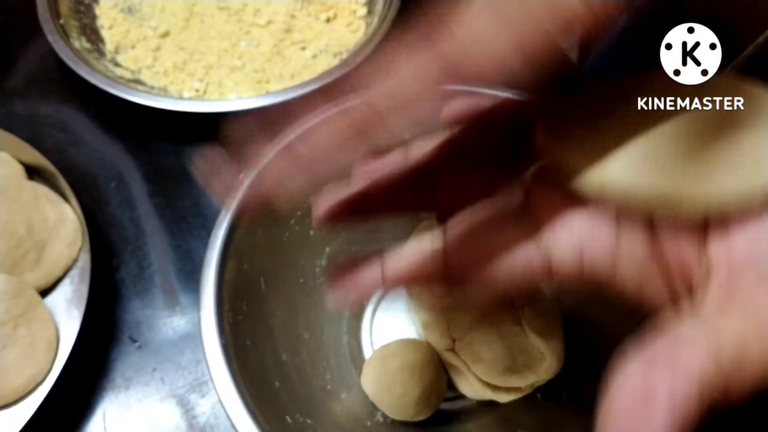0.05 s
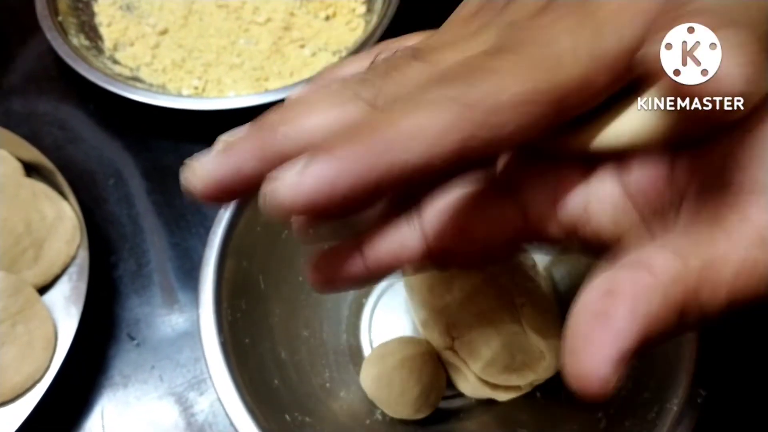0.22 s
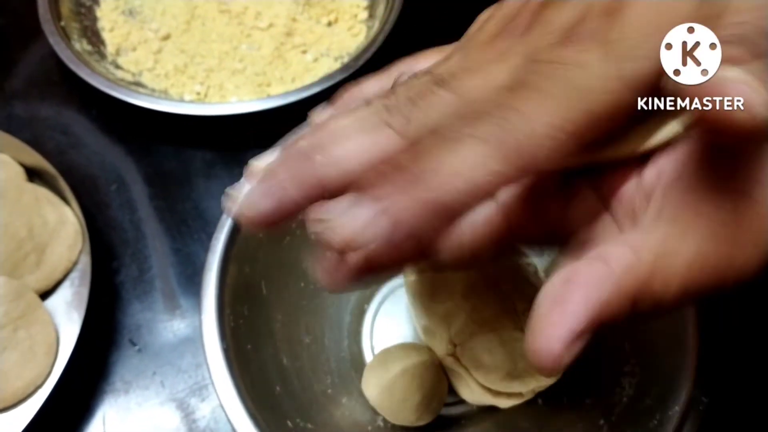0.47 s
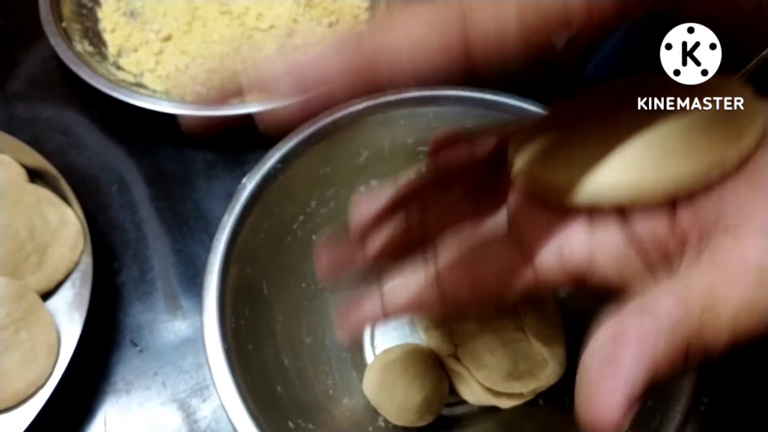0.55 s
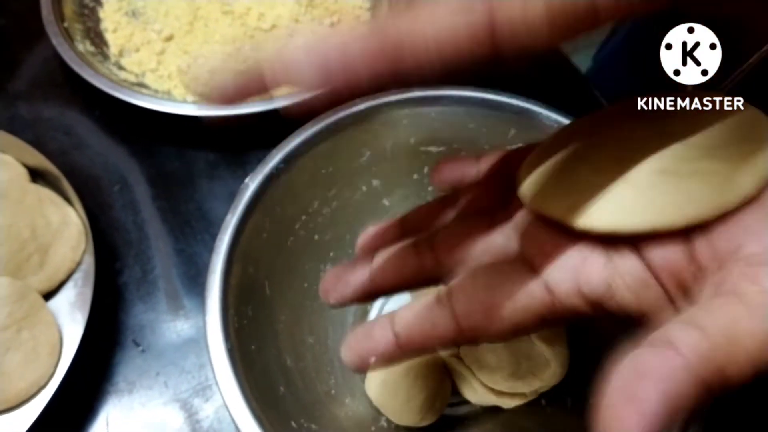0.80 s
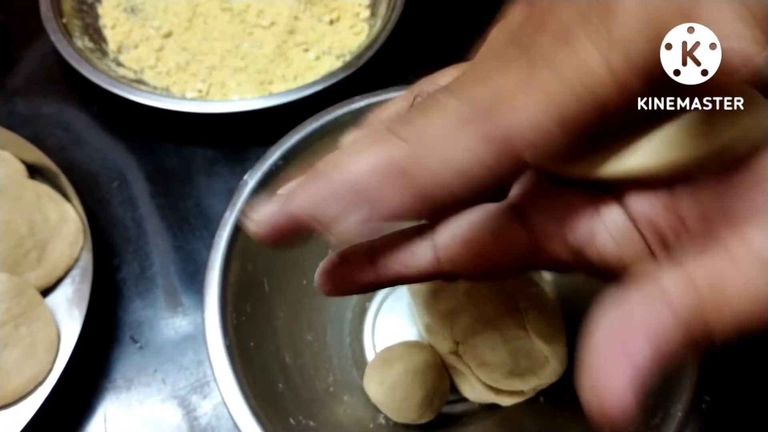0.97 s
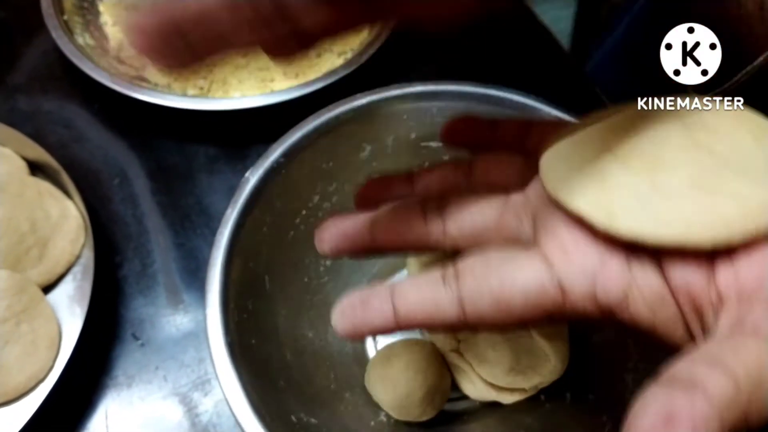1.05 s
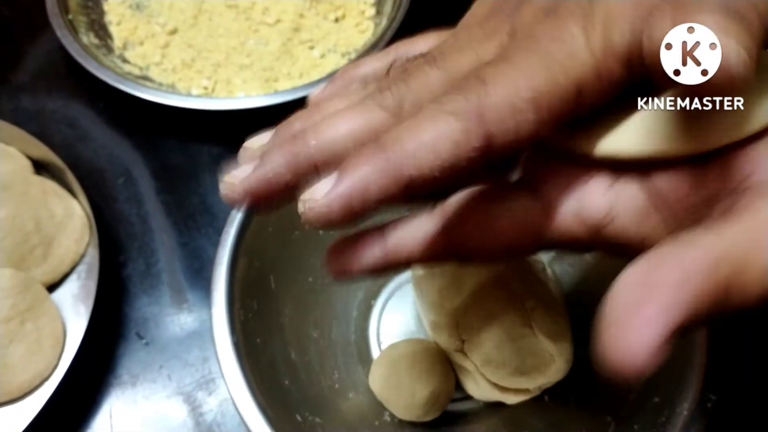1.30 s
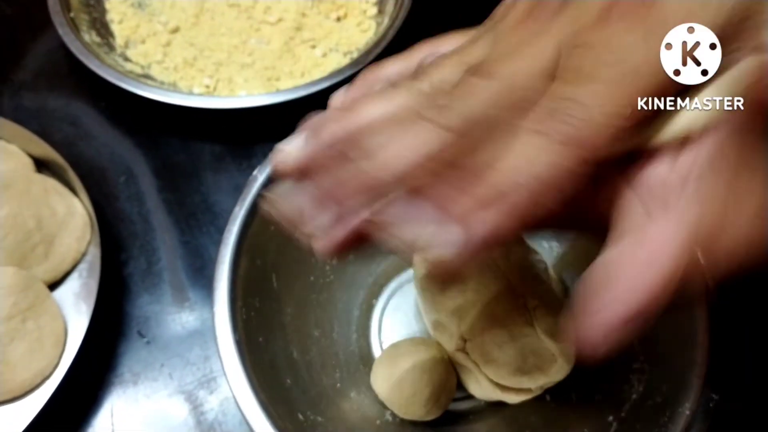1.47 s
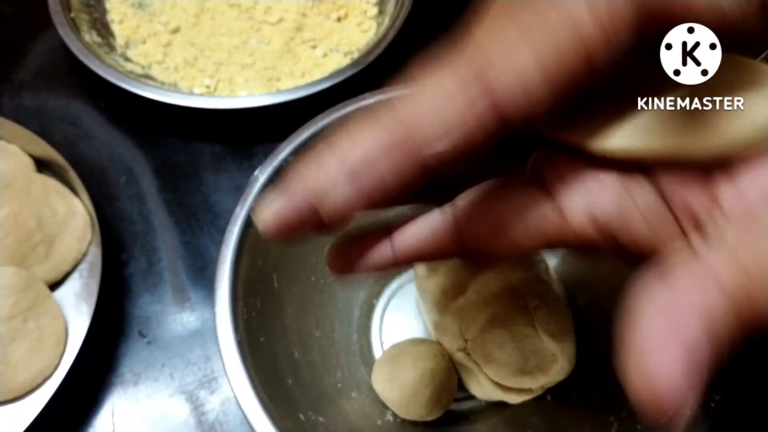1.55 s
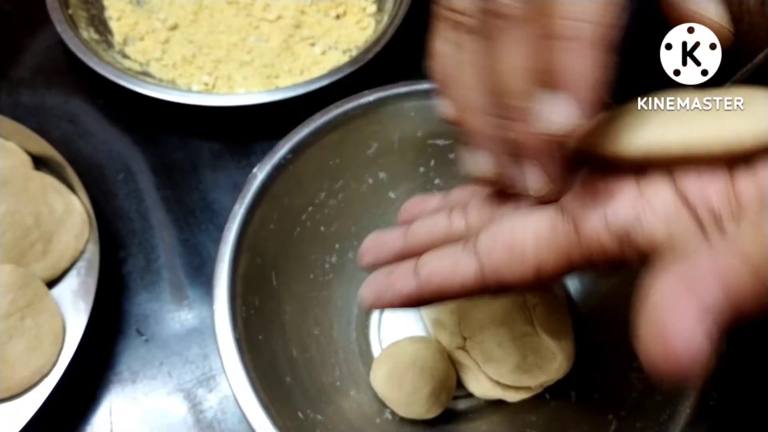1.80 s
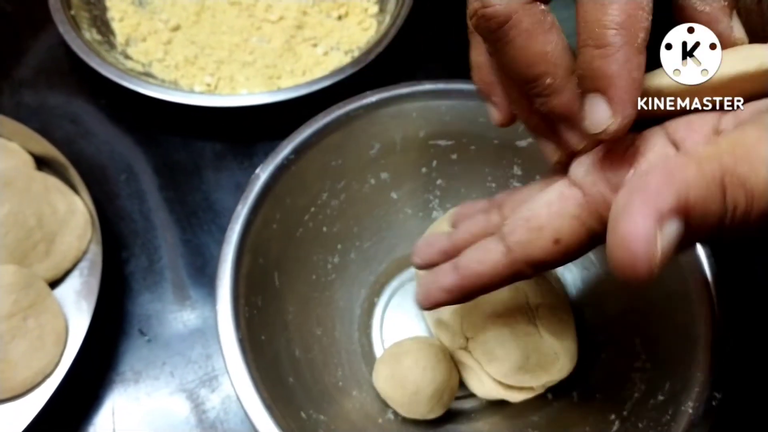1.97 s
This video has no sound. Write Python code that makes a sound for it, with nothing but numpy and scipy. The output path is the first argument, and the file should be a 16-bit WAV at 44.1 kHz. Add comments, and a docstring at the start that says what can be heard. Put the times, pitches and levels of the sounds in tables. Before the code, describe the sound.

Close, sharp slaps of palm on soft dough, six at a brisk uneven pace with one longer gap before the fifth, then only the fading hard-walled room ring and quiet background hum.

```python
"""Patting a cake of dough

A hand slaps a flat cake of dough lying on the other palm, six times, close to the microphone.
Each slap layers damped tones (thud, smack, trapped air) with short noise bursts (spray, crack, sizzle).
A dull echo stands for the steel bowl and counter below; shaped, decaying noise rings as a hard-walled
kitchen. Two slaps whistle, fingers brush once, and steady filtered noise and a faint hum lie beneath."""
import sys
import numpy as np
from scipy import signal
from scipy.fft import rfft, irfft
from scipy.io import wavfile
from scipy.ndimage import uniform_filter1d

SR = 44100
rng = np.random.default_rng(int(sys.argv[2]) if len(sys.argv) > 2 else 0)


def to_wav(s):
    """Save 16-bit WAV."""
    ch = np.atleast_2d(s).T  # columns
    pcm = np.round(np.clip(ch, -1, 1) * 32767)  # PCM
    wavfile.write(sys.argv[1], SR, pcm.astype(np.int16))


N = 90404

# One slap per row, with relative levels: (time [s], thud level [dB], thud pitch [Hz], smack level [dB],
# air pocket level [dB], air pocket pitch [Hz], spray level [dB], spray centre [Hz],
# crack level [dB], sizzle level [dB], room level [dB])
SLAP_EVENTS = [ (0.2458, -13.5, 325, -9.5, -2, 2486, -16.5, 3430, -19, -36.5, 2.5),
               (0.4857, -8.5, 308, -1, -0.5, 2580, -30.5, 5500, -22, -36, -1),
               (0.7073, -7, 314, -6.5, -10.5, 2890, -36, 7800, -22.5, -39, -2),
               (0.9160, -6, 358, -3.5, -3, 2500, -21, 5800, -17, -33.5, 0),
               (1.278, -12.5, 310, -9.5, -7, 2553, -23, 4810, -22, -39, 1.5),
               (1.4947, -8, 310, -8.5, -2, 2553, -24.5, 6350, -17.5, -31.5, 1)]
# Modes of the air pocket between palm and dough: (multiple of its pitch, level [dB], decay [s])
POCKET_MODES = [(0.802, -9.5, 0.00093), (0.998, -3, 0.00078), (1.152, -8.5, 0.00037)]
# Spectral shape of skin cracking onto dough: (frequency [Hz], relative density [dB per Hz])
CRACK_SPECTRUM = [(150, -33), (500, -10), (1300, 2.5), (2500, 14), (4200, -8), (7000, -2), (9000, -11),
                  (11500, -18), (15000, -30)]
# Colour of the kitchen ring: (frequency [Hz], relative level [dB])
ROOM_COLOUR = [(80, 5), (200, -1.5), (350, -1.5), (600, 4), (1300, -0.5), (2600, -2), (5000, 4),
               (9000, 0.5), (15000, 4)]
# Time the late kitchen ring takes to fall 60 dB: (frequency [Hz], time [s])
ROOM_DECAY = [(150, 0.88), (400, 0.73), (1000, 0.55), (2700, 0.5), (7000, .5), (15000, .44)]
# Spectral shape of the kitchen background: (frequency [Hz], relative density [dB per Hz])
AIR_SPECTRUM = [(30, -32), (60, -50), (100, -5.5), (135, -2.5), (170, -8.5), (280, -1), (430, -8),
                (800, -8.5), (1500, -14.5), (2400, -11.5), (4000, -24.5), (6500, -32.5), (9500, -45.5),
                (15000, -44)]
# Fingers shifting on the dough, with a bell-shaped swell: (centre time [s], spread [s], level [dB])
FINGER_RUBS = [(1.978, 0.018, -75)]
# Air whistling out through a narrow gap in the dough: (time [s], pitch [Hz], level [dB])
GAP_WHISTLES = [(1.4985, 5600, -25), (0.7105, 3300, -18)]

AIR_DB, HUM_HZ, HUM_DB = -48.5, 120, -60.5
RUB_HZ, RUB_WIDTH_OCT = 11000, 0.47

# Kitchen: a cluster of wall reflections, an early wash and a late ring
WALLS_S, WALLS_DECAY_S, WALLS_DB = 0.012, 0.013, -10
EARLY_DB, EARLY_T60_S = -5, 0.28
ROOM_DB, ROOM_GAP_S, ROOM_BUILD_S = -7.5, 0.0017, 0.0056
BOWL_ECHO_S, BOWL_ECHO_DB, BOWL_TOP_HZ = 0.003096, -16.5, 1450

# Slap: the skin closes just after the dough begins to give
CONTACT_LAG_S = 0.000634
THUD_RISE_S, THUD_DECAY_S, THUD_LOW_HZ = 0.00094, 0.0018, 202
SMACK_HZ, SMACK_DECAY_S = 1026, 0.0003
POCKET_RISE_S, POCKET_LAG_S = 0.00035, 0.000409
RUSH_DB, RUSH_DECAY_S, RUSH_WIDTH_OCT = -4, 0.0025, 0.27  # turbulent air around the pocket's pitch
SPRAY_RISE_S, SPRAY_DECAY_S, SPRAY_WIDTH_OCT = 0.00031, 0.0036, 0.29
CRACK_DECAY_S = 0.0044
SIZZLE_HZ, SIZZLE_WIDTH_OCT = 14100, 0.3  # moist skin at the very top
WHISTLE_RISE_S, WHISTLE_DECAY_S = 0.00074, 0.0031

LEAD_S = 0.3  # rendered ahead of the start, then trimmed
EARLIER_SLAP_S, EARLIER_SLAP_ROOM_DB = -0.1, -1  # its ring is still dying away at the start

PEAK_CEILING, LOW_CUT_HZ, TOP_HZ = 1.1, 75, 15700


def undb(db):
    """Decibels to gain."""
    return 10 ** (np.asarray(db) / 20)


def unit(x):
    """Scale to an rms of 1."""
    return x / np.sqrt(np.mean(x ** 2))


def lookup(table, hz):
    """Read a table of (frequency [Hz], value) on a log-frequency axis."""
    table_hz, values = np.array(table, float).T
    return np.interp(np.log(np.maximum(hz, 1)), np.log(table_hz), values)


def bins(n):
    """Frequencies of the spectrum of n samples."""
    return np.arange(n // 2 + 1) * SR / n


def noise(n, gain):
    """Random-phase noise of rms 1 with the given gain at each frequency."""
    phase = 2 * np.pi * rng.random(len(gain))
    return unit(irfft(gain * np.exp(1j * phase), n))


def hump(n, hz, octaves):
    """Bell-shaped gain around a centre frequency."""
    distance_oct = np.log2(np.maximum(bins(n), 1) / hz)
    return np.exp(-0.5 * (distance_oct / octaves) ** 2)


def butter(x, hz, kind, order=2):
    """Plain low-pass or high-pass."""
    return signal.sosfilt(signal.butter(order, hz, kind, fs=SR, output="sos"), x)


def burst(t, rise, decay):
    """Envelope with a fast rise and an exponential decay."""
    t = np.maximum(t, 0)
    return (1 - np.exp(-t / rise)) * np.exp(-t / decay)


def ring(t, hz, rise, decay):
    """One damped resonance."""
    return burst(t, rise, decay) * np.sin(2 * np.pi * hz * t)


def puff(t, rise, decay, gain):
    """A short burst of noise whose spectrum follows the given gains smoothly, without holes."""
    envelope = burst(t, rise, decay)
    x = noise(len(t), gain)
    # alternate between the wanted envelope in time and the wanted gains in frequency
    for _ in range(3):
        level_noise = np.cos(np.angle(signal.hilbert(x)))
        phase = np.angle(rfft(envelope * level_noise))
        x = irfft(gain * np.exp(1j * phase), len(t))
    return unit(x) * np.sqrt(np.mean(envelope ** 2))


def walk(rate):
    """Slow random drift of rms 1, from twice-smoothed random steps."""
    k = int(SR / rate)
    steps = np.repeat(rng.standard_normal(N)[:N // k + 1], k)
    smooth = uniform_filter1d(uniform_filter1d(steps, k), k)
    return unit(smooth[:N])


def add(out, x, at_s):
    """Mix x into out from a given time."""
    i = max(int(round(at_s * SR)), 0)
    out[i:i + len(x)] += x[:max(len(out) - i, 0)]


def background():
    """Steady shaped noise and a low hum of constant level whose phase drifts."""
    air = undb(AIR_DB) * noise(N, undb(lookup(AIR_SPECTRUM, bins(N))))
    phase = 2 * np.pi * HUM_HZ * np.arange(N) / SR + 0.85 * walk(3.5)
    hum = undb(HUM_DB) * np.sqrt(2) * np.sin(phase)
    return air + hum


def kitchen(size=32768):
    """Room response, drawn anew as the hands move: near walls, an early wash and a longer ring."""
    t, hz = np.arange(size) / SR, bins(size)
    wash = rfft(noise(size, np.ones(len(hz)))) * undb(lookup(ROOM_COLOUR, hz))
    centres = np.geomspace(ROOM_DECAY[0][0], ROOM_DECAY[-1][0], 8)
    to_60db = np.log(1000)  # time constants in a 60 dB fall
    walls = undb(WALLS_DB) * unit(burst(t - WALLS_S, 1 / SR, WALLS_DECAY_S))
    early = undb(EARLY_DB) * unit(burst(t - ROOM_GAP_S, ROOM_BUILD_S, EARLY_T60_S / to_60db))
    out = np.zeros(size)
    # overlapping bands, each with its own late decay
    for centre, share in zip(centres, np.eye(len(centres))):
        band = irfft(wash * lookup(list(zip(centres, share)), hz), size)
        late_decay = lookup(ROOM_DECAY, centre) / to_60db
        late = undb(ROOM_DB) * unit(burst(t - ROOM_GAP_S, ROOM_BUILD_S, late_decay))
        out += band * np.sqrt((walls ** 2 + early ** 2 + late ** 2) / size)
    return out


def fingers():
    """A faint brush of skin over dough: high noise under a bell-shaped swell."""
    t = np.arange(N) / SR
    swell = sum(undb(db) * np.exp(-0.5 * ((t - at) / spread) ** 2) for at, spread, db in FINGER_RUBS)
    return swell * noise(N, hump(N, RUB_HZ, RUB_WIDTH_OCT))


def whistle(hz, db, size=2048):
    """A few milliseconds of pitched air, prolonged by the room."""
    dry = undb(db) * ring(np.arange(size) / SR, hz, WHISTLE_RISE_S, WHISTLE_DECAY_S)
    out = signal.fftconvolve(dry, kitchen())
    add(out, dry, 0)
    return out


def slap(thud_db, thud_hz, smack_db, pocket_db, pocket_hz, spray_db, spray_hz, crack_db, sizzle_db, size=2048):
    """The dough thuds, skin smacks and cracks, trapped air rings and sprays out through the gaps."""
    t = np.arange(size) / SR
    thud = butter(undb(thud_db) * ring(t, thud_hz, THUD_RISE_S, THUD_DECAY_S), THUD_LOW_HZ, "high")

    t = t - CONTACT_LAG_S
    smack = butter(undb(smack_db) * ring(t, SMACK_HZ, 1 / SR, SMACK_DECAY_S), thud_hz, "high")

    pocket_t = t - POCKET_LAG_S
    pocket = sum(undb(db) * ring(pocket_t, pocket_hz * multiple, POCKET_RISE_S, decay)
                 for multiple, db, decay in POCKET_MODES)
    rush_gain = hump(size, pocket_hz, RUSH_WIDTH_OCT)
    rush = undb(RUSH_DB) * puff(pocket_t, POCKET_RISE_S, RUSH_DECAY_S, rush_gain)

    spray_gain = hump(size, spray_hz, SPRAY_WIDTH_OCT)
    spray = undb(spray_db) * puff(t, SPRAY_RISE_S, SPRAY_DECAY_S, spray_gain)
    crack_gain = undb(lookup(CRACK_SPECTRUM, bins(size)))
    crack = undb(crack_db) * puff(t, SPRAY_RISE_S, CRACK_DECAY_S, crack_gain)
    sizzle_gain = hump(size, SIZZLE_HZ, SIZZLE_WIDTH_OCT)
    sizzle = undb(sizzle_db) * puff(t, SPRAY_RISE_S, CRACK_DECAY_S, sizzle_gain)

    pocket_level = undb(pocket_db)
    return np.array([2 * thud, smack, 2 * pocket_level * pocket, pocket_level * rush, spray, crack, sizzle])


def heard(blow, room_db):
    """One slap at the microphone: direct, thrown back dully by the bowl, and ringing in the room."""
    parts = slap(*blow)
    dry = parts.sum(axis=0)
    # in the room the parts add in power, so none cancels another
    power_sum = np.linalg.norm(rfft(parts), axis=0)
    spread = irfft(power_sum * np.exp(1j * np.angle(rfft(dry))))
    out = undb(room_db) * signal.fftconvolve(spread[:len(spread) // 2], kitchen())
    add(out, dry, 0)
    bowl_echo = undb(BOWL_ECHO_DB) * butter(dry, BOWL_TOP_HZ, "low", order=1)
    add(out, bowl_echo, BOWL_ECHO_S)
    return out


def patting():
    """All the slaps in turn, over the tail of an earlier one; some squeeze out a brief whistle."""
    out = np.zeros(N + int(LEAD_S * SR))
    for at, *blow, room_db in SLAP_EVENTS:
        add(out, heard(blow, room_db), LEAD_S + at)
    earlier_blow = SLAP_EVENTS[3][1:-1]  # struck like the fourth slap
    add(out, heard(earlier_blow, EARLIER_SLAP_ROOM_DB), LEAD_S + EARLIER_SLAP_S)
    for at, hz, db in GAP_WHISTLES:
        add(out, whistle(hz, db), LEAD_S + at)
    return out[-N:]


def scene():
    """Slaps, fingers and background in one channel."""
    return (patting() + fingers() + background())[None]


def record(dry):
    """The microphone rounds the highest peaks, thins the bass and cuts the top."""
    rounded = PEAK_CEILING * np.tanh(dry / PEAK_CEILING)
    thin = butter(rounded, LOW_CUT_HZ, "high")
    top_cut = signal.ellip(10, 0.2, 70, TOP_HZ, fs=SR, output="sos")
    return signal.sosfilt(top_cut, thin)


dry = scene()
out = record(dry)
to_wav(out)
```